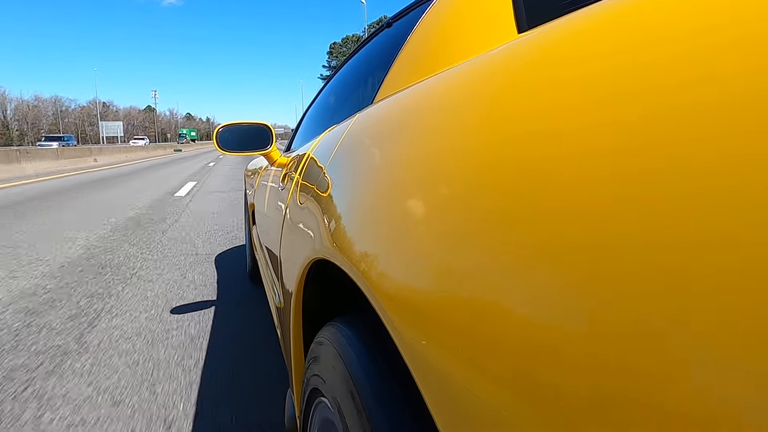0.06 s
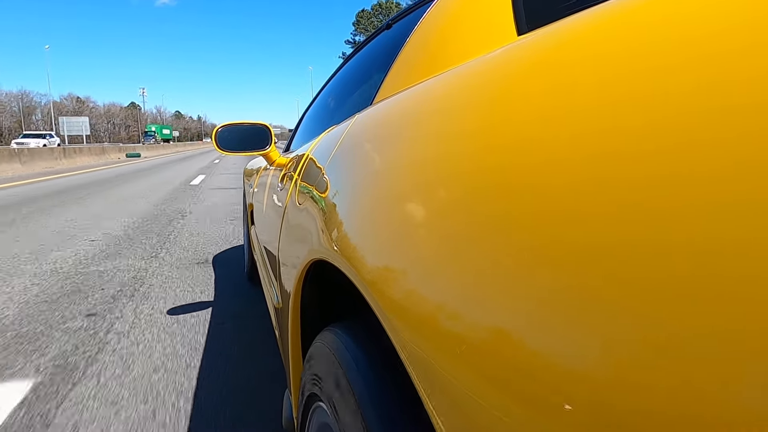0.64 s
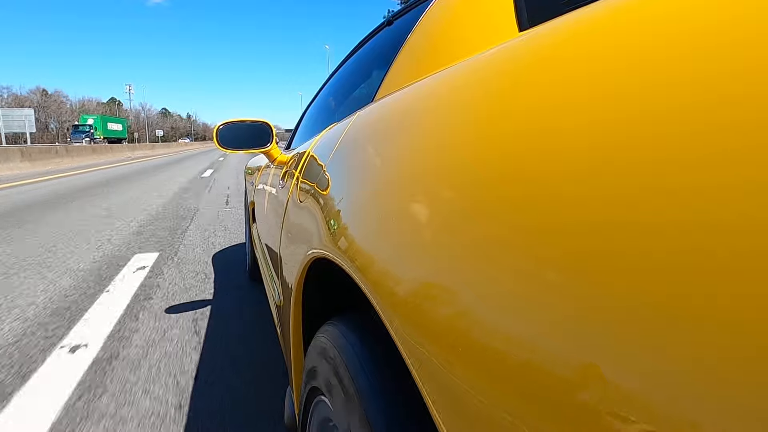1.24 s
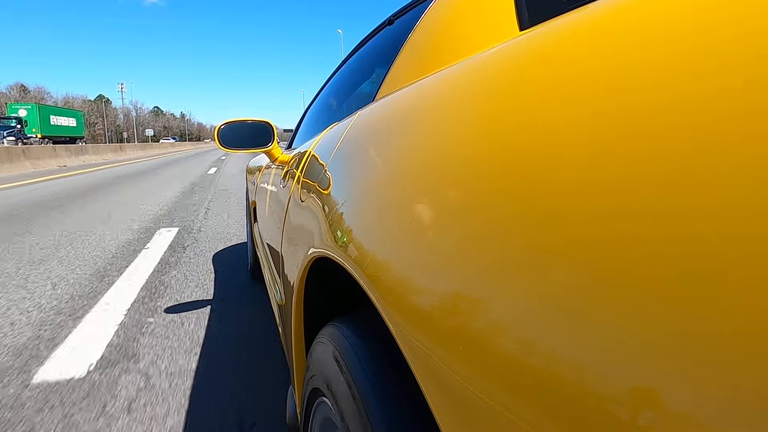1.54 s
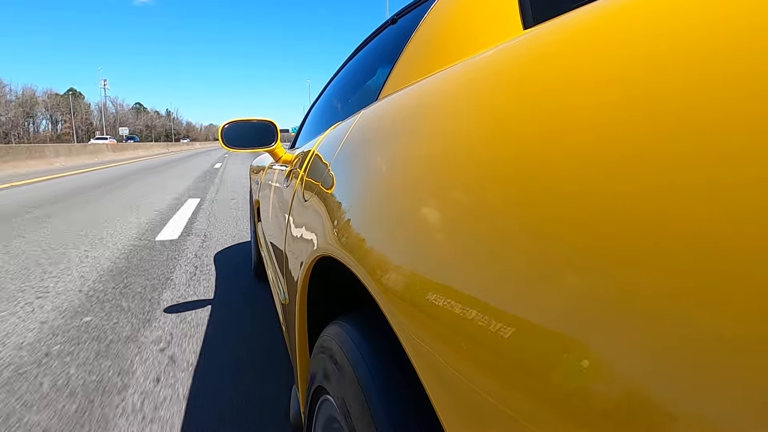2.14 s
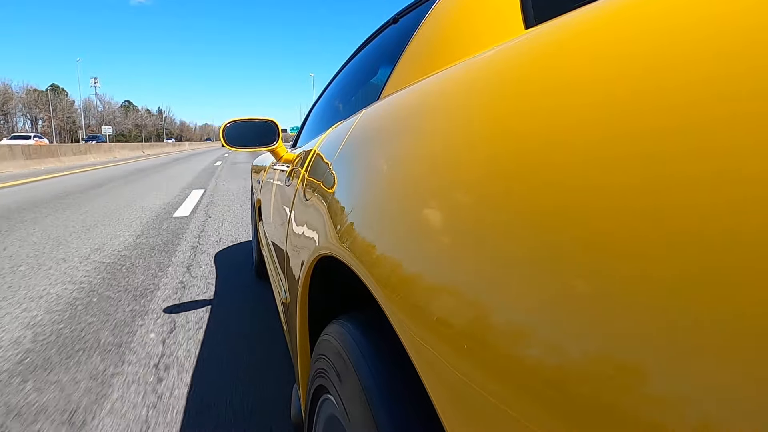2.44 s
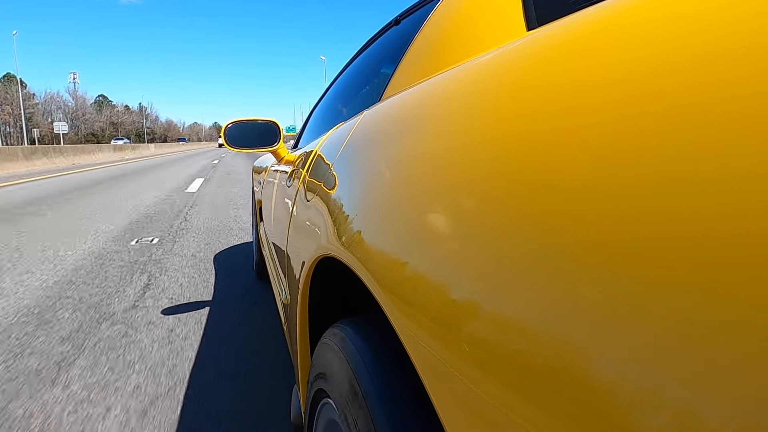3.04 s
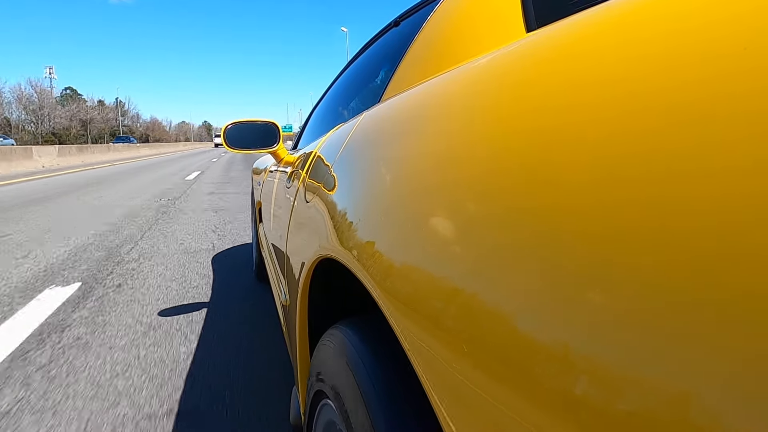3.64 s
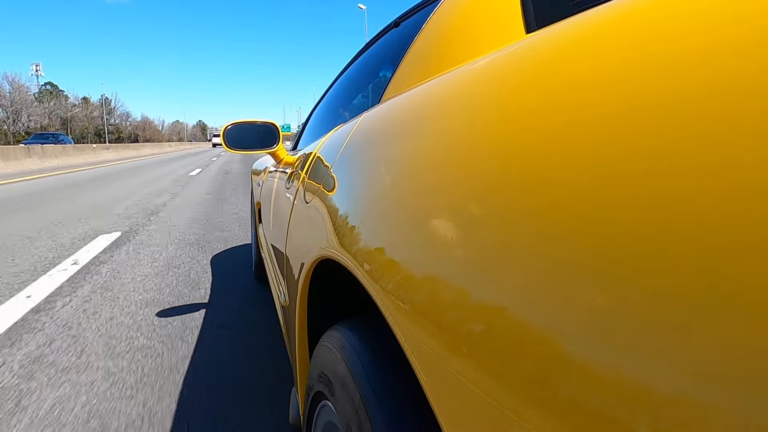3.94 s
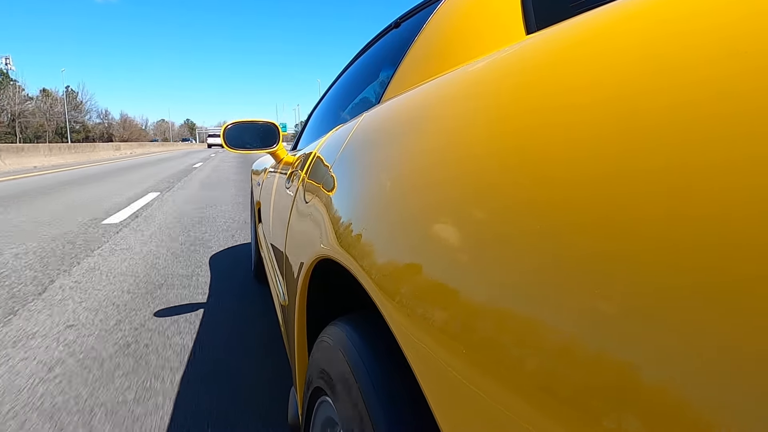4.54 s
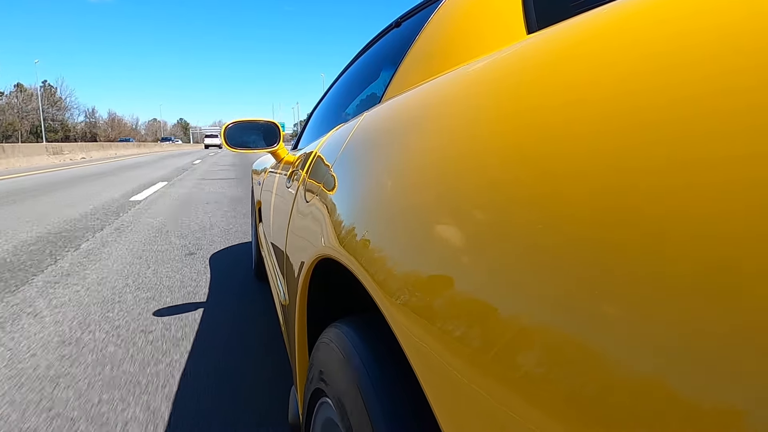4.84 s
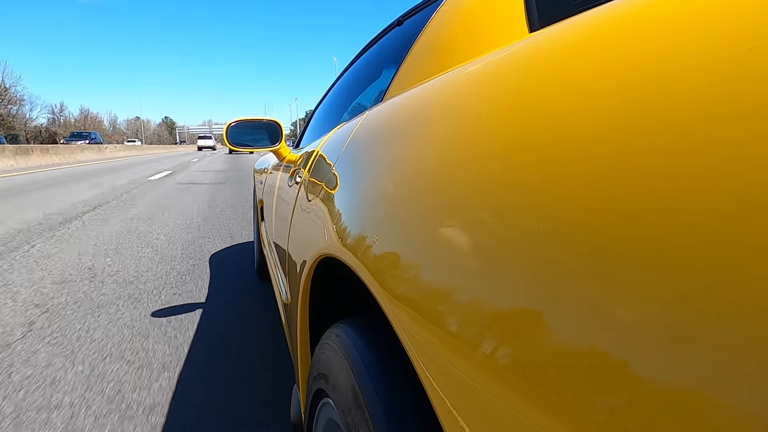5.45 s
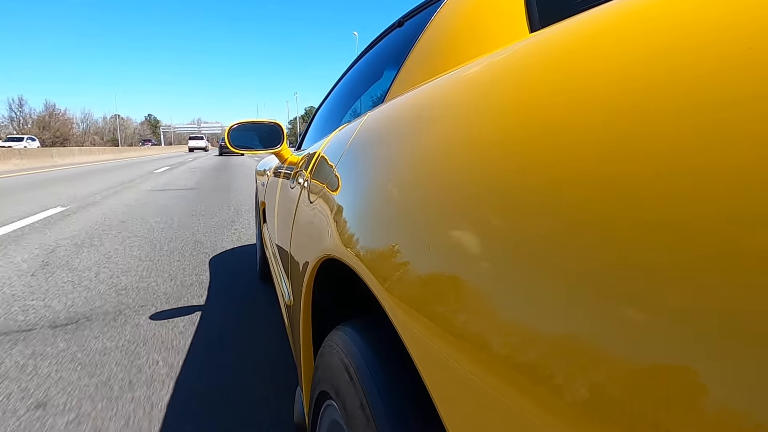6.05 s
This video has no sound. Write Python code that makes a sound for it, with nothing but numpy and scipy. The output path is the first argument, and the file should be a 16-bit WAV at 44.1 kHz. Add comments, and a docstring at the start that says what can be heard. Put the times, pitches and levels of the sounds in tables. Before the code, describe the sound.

Heavy wind buffets the microphone on a car at highway speed, over roaring tyres and a faint, throaty exhaust drone.

```python
"""Highway, at a camera on the rear flank of a V8 sports car at speed.
The slipstream buffets the microphone and hisses over its housing; shed vortices add a wandering throb.
Tyres roar on the asphalt, a throaty rumble swells, the exhaust drones faintly under the wind.
The camera's limiter holds down the strongest buffets."""
import sys
import numpy as np
from scipy import signal
from scipy.fft import rfft, irfft, next_fast_len
from scipy.io import wavfile
from scipy.ndimage import uniform_filter1d, minimum_filter1d, map_coordinates

SR = 44100
rng = np.random.default_rng(int(sys.argv[2]) if len(sys.argv) > 2 else 0)


def wav_out(sig):
    """Save sig, one row per channel (or a flat mono array), as 16-bit PCM at SR to the path in sys.argv[1]."""
    wavfile.write(sys.argv[1], SR, np.round(np.clip(np.atleast_2d(sig).T, -1, 1) * 32767).astype(np.int16))


N = 277389

# four-stroke cycle rate: time_s, cycle_hz
ENGINE_SPEED = [(0, 17.57), (6.29, 15.2)]
# exhaust partials, eight firings a cycle: cycle_multiple, level_db
EXHAUST_PARTIALS = [(8, 0.5), (10, 3.5), (12, 4.5), (18, -0.5), (27, -8)]
# throaty rumble: freq_hz, density_db
THROAT_SPECTRUM = [(120, -44), (205, -11.5), (245, 0.5), (300, -1), (345, -10.5), (600, -50), (2000, -100)]
# brief hollow swells: peak_s, length_s, pitch_hz, level_db
HOLLOW_SWELLS = [(.04, 0.1, 470, -28), (.45, 0.24, 310, -27), (1.199, 0.16, 165, -26),
                 (1.776, 0.22, 248, -17.5), (1.94, 0.27, 290, -20.5), (2.21, .08, 590, -28.5),
                 (2.47, .25, 135, -24), (3.05, .2, 140, -25), (3.52, .18, 290, -26), (4.04, .28, 200, -23),
                 (4.45, 0.31, 430.6, -29), (5.14, 0.14, 160, -22)]
# air churned in the wheel arch: freq_hz, density_db
ARCH_SPECTRUM = [(250, -32), (390, -2), (470, -0.5), (560, -5.5), (630, -9.5), (690, -8.5), (780, -15),
                 (1300, -31), (3000, -68.5)]
# wheel arch rush: time_s, level_db
ARCH_LEVEL = [(0, -22), (.27, -28.5), (.7, -28), (1.6, -30.5), (2.3, -31), (3.6, -30), (4.5, -27.5),
              (5.2, -32.5), (6.29, -29.5)]
# tread on asphalt: freq_hz, density_db
TREAD_SPECTRUM = [(300, -26), (600, -3), (760, -3), (880, -0.3), (1130, 1), (1300, -2), (1650, -5.5),
                  (2000, -10), (2600, -26), (3600, -37), (5500, -38), (12000, -84.5)]
# slow trend of road and air: time_s, roar_db, hiss_db
RUSH_LEVELS = [(0, -28, -40.5), (.25, -34, -40.5), (.55, -30.5, -39), (1.25, -32, -41.5),
               (1.7, -29.7, -40.5), (1.9, -33.5, -43), (2.1, -30, -42), (2.85, -33.5, -41),
               (3.25, -28.2, -41), (3.75, -29, -42), (4.3, -28.5, -38), (4.85, -29.5, -40),
               (5.4, -30.5, -38.5), (5.75, -32, -40), (6.29, -29, -38.5)]
# gusts (+) and sudden dips (-), like a limiter ducking: peak_s, length_s, hiss_db, roar_db
RUSH_GUSTS = [(.449, 0.04, 0.5, 2.5), (.7, 0.062, 0, 0), (.785, 0.084, -6, -5), (.96, 0.079, 2, 1.2),
              (1.058, 0.023, 1, 1), (1.082, .029, -2, -3), (1.22, 0.087, 1.5, 2.5),
              (1.351, 0.022, -1.9, -5), (1.427, 0.072, -0.5, 1.8), (1.566, .068, -2, -2),
              (1.957, 0.02, -3, -7), (2.066, 0.044, 0.5, 3), (2.182, .05, 7, 3.5), (2.315, .035, -3, -3),
              (2.407, 0.098, 2.2, 3.5), (2.625, 0.061, 1.5, 3.5), (2.694, 0.037, -4, .7),
              (2.806, .124, 2, 6), (2.964, .065, 3, 4.5), (3.256, .058, -2.5, -2), (3.41, .055, -2, -2),
              (3.497, 0.025, 3, 0.5), (3.55, .05, -2.5, -2), (3.663, .067, 2.4, 2), (3.71, 0.019, -4, -3.5),
              (3.873, 0.024, -.9, -5.4), (4.055, 0.05, 3, 1), (4.15, 0.065, 1.5, -0.5),
              (4.244, 0.026, -4.6, -4), (4.696, 0.051, 3.6, 2.5), (4.757, .028, 2, -4),
              (4.912, 0.072, 4, 1), (5.173, 0.036, -4, -1.5), (5.255, .06, 4, 1), (5.305, 0.036, 5, 4.8),
              (5.337, .04, -2.5, -4), (5.425, 0.091, 1.5, 5), (5.584, .023, 1, 1.5), (5.851, .07, 3.6, 1.9),
              (5.88, .022, -6, -5), (5.941, .047, -3, -3), (6.123, .035, 4.5, 4.5),
              (6.152, 0.092, -3.5, -5)]
# air over the microphone port: freq_hz, density_db
HISS_SPECTRUM = [(500, -4), (1800, 10.5), (2500, 7.5), (3100, 1), (3600, 0.5), (4400, -8), (5500, -14.3),
                 (7600, -15.5), (9300, -19), (10300, -22.5)]
# bright sizzle of the opening gust: freq_hz, density_db
SIZZLE_SPECTRUM = [(1500, -16.5), (3000, 8.5), (4700, 2.5), (6200, -5), (8500, -13), (10000, -12.5)]
# fading sizzle: time_s, level_db
SIZZLE_FADE = [(0, -40), (.15, -48), (.68, -50), (.8, -55), (2.5, -57), (4, -57.5), (6.29, -59.5)]
# vortices leaving the flank: time_s, shed_hz, level_db
VORTEX_SHEDDING = [(0, 102.3, -21), (.2, 101.1, -21.5), (.6, 109.8, -21.5), (.8, 72.8, -22.5),
                   (1.15, 78.1, -23), (1.5, 104, -23), (1.9, 109.4, -19.5), (2.05, 106.6, -27),
                   (2.23, 108.4, -20.5), (2.45, 79.86, -25), (2.85, 86, -21.5), (3.13, 75, -17.5),
                   (3.3, 72.86, -23), (3.55, 72, -22), (4.05, 93.9, -22.5), (4.35, 76, -23),
                   (4.7, 108, -22), (5.05, 88, -22.5), (5.5, 84, -22.5), (5.72, 105.6, -21),
                   (6.03, 78.1, -19), (6.29, 105, -22.5)]
# small eddies off the camera housing: freq_hz, density_db
FLUTTER_SPECTRUM = [(60, -24.5), (130, -9.5), (190, -1.5), (300, -1), (350, -6), (430, -9.5), (560, -21.5),
                    (1300, -48.5), (3000, -93.5)]
# large eddies on the microphone: freq_hz, density_db
BUFFET_SPECTRUM = [(5, -17), (20, -7.5), (40, -4.5), (65, 1.5), (90, -3.5), (125, 0.5), (170, -6.5),
                   (260, -17.5), (600, -69)]
# wind surges (+) and dips (-): peak_s, length_s, large_eddy_db, small_eddy_db
EDDY_SURGES = [(.176, 0.1, 4, 3), (.405, 0.065, -3.5, 0), (1.27, 0.42, 0, 2), (1.8, 0.32, 0.1, 2),
               (2.228, 0.13, -0.5, -1.5), (2.51, 0.15, 1.5, 3.5), (3.057, .087, 0, 2),
               (3.121, 0.092, 1, -2), (3.76, 0.072, 1, 0), (4.01, .25, 0.5, 1), (4.44, 0.26, 1, -1),
               (4.885, 0.11, 0, -2), (5.145, 0.069, -1.5, 3), (5.5, 0.18, 1, 0), (5.77, .125, 1.5, -0.5),
               (5.95, 0.31, -1.5, -0.5)]
# microphone treble roll-off: freq_hz, gain_db
MIC_RESPONSE = [(8500, 0), (10300, -8), (12000, -20), (15500, -37)]

BUILD_SHARE = 0.65  # slow side's share of a gust, dip or swell
RUMBLE_SWING_DB, RUSH_SWING_DB = 0.6, 0.63  # depth of the flow's unsteadiness


def amp(db):
    """Decibels to gain."""
    return 10 ** (np.asarray(db) / 20)


def unit(x):
    """x at rms 1."""
    return x / np.sqrt(np.mean(x ** 2) + 1e-20)


def curves(rows):
    """One per-sample curve for each column after time_s."""
    time_s, *columns = np.transpose(rows)
    return [np.interp(np.arange(N) / SR, time_s, column) for column in columns]


def gain_at(spectrum, hz):
    """Gain from a dB table, read on a log frequency axis."""
    freq_hz, level_db = np.transpose(spectrum)
    return amp(np.interp(np.log(hz + 1), np.log(freq_hz + 1), level_db))


def wobble(rate_hz):
    """Smooth random curve, rate_hz knots a second."""
    knots = rng.standard_normal(int(N * rate_hz / SR) + 4)
    return map_coordinates(knots, [np.arange(N) * rate_hz / SR])


def phase(hz):
    """Running phase in radians."""
    return 2 * np.pi * np.cumsum(hz) / SR


def smooth(x, width_s):
    """Two running means: a triangular window."""
    width = max(int(width_s * SR), 1)
    return uniform_filter1d(uniform_filter1d(x, width), width)


def filtered(x, response):
    """x through a frequency response."""
    size = next_fast_len(N + 8192)
    return irfft(rfft(x, size) * response(np.fft.rfftfreq(size, 1 / SR)), size)[:N]


def bump(peak_s, length_s, rise_share):
    """Lopsided bell of height 1, length_s wide at half height."""
    t = np.arange(N) / SR - peak_s
    side_s = length_s * np.where(t < 0, rise_share, 1 - rise_share)
    return np.exp2(-np.minimum((t / side_s) ** 2, 60))


def gusting(rows):
    """Two dB curves: gusts build slowly and break off, dips drop fast and recover slowly."""
    total_db = np.zeros((2, N))
    for peak_s, length_s, *levels_db in rows:
        rise_share = BUILD_SHARE if sum(levels_db) > 0 else 1 - BUILD_SHARE
        total_db += np.outer(levels_db, bump(peak_s, length_s, rise_share))
    return total_db


def turbulence(spectrum, patchy_db, even_s):
    """Coloured noise; bands swell and fade in patches, total power stays even over even_s."""
    bands = signal.stft(rng.standard_normal(N), nperseg=512)[2]
    patches = uniform_filter1d(rng.standard_normal(bands.shape), size=9, axis=0)
    patches = uniform_filter1d(patches, size=10, axis=1)
    patchy = signal.istft(bands * amp(patchy_db * unit(patches)), nperseg=512)[1][:N]
    noise = unit(filtered(patchy, lambda hz: gain_at(spectrum, hz)))
    return noise / np.sqrt(np.abs(smooth(noise ** 2, even_s)) + 1e-9)


def exhaust(level_db=-30.5):
    """Uneven firing of the two banks: a wavering drone on multiples of the engine cycle."""
    cycle_hz, = curves(ENGINE_SPEED)
    cycle_rad = phase(cycle_hz)
    drone = np.zeros(N)
    for multiple, partial_db in EXHAUST_PARTIALS:
        gain = amp(partial_db + 2.3 * wobble(1.7))
        drone += gain * np.sin(round(multiple) * cycle_rad + rng.uniform(0, 2 * np.pi))
    return amp(level_db) * unit(drone)


def throaty_rumble(steady_db=-36, swell_width_hz=56.3):
    """Steady rumble with brief swells of narrow noise, each at its own pitch."""
    rumble = amp(steady_db) * turbulence(THROAT_SPECTRUM, patchy_db=0.5, even_s=0.067)
    for peak_s, length_s, pitch_hz, level_db in HOLLOW_SWELLS:
        tone = np.sin(phase(pitch_hz + swell_width_hz / 2 * wobble(90)))
        envelope = amp(level_db + 2.9 * wobble(70)) * bump(peak_s, length_s, BUILD_SHARE)
        rumble += envelope * tone
    return rumble


def tyres(roar_db):
    """Tread blocks slap the asphalt and pump air; the wheel churns the air in its arch."""
    arch_db, = curves(ARCH_LEVEL)
    tread = amp(roar_db + 0.61 * wobble(40)) * turbulence(TREAD_SPECTRUM, patchy_db=0.92, even_s=0.043)
    arch = amp(arch_db) * turbulence(ARCH_SPECTRUM, patchy_db=2.0, even_s=0.14)
    return tread + arch


def port_ring(re_hiss_db=-24.5, centre_hz=8530, width_hz=1200, swing_db=2):
    """Air across the microphone port excites its resonance in uneven puffs."""
    def resonance(hz):
        damping = 1j * hz * width_hz
        return damping / (centre_hz ** 2 - hz ** 2 + damping)

    ring = filtered(rng.standard_normal(N), resonance)
    return amp(re_hiss_db + swing_db * wobble(26)) * unit(ring)


def vortex_throb(jitter_hz=15.03, swing_db=2.5):
    """Vortices shed at a wandering rate beat on the microphone: an unsteady low note."""
    shed_hz, level_db = curves(VORTEX_SHEDDING)
    tone = np.sin(phase(shed_hz + jitter_hz * wobble(42)))
    return amp(level_db) * unit(amp(swing_db * wobble(22)) * tone)


def slipstream(hiss_db, gust_db, unsteady, buffet_db=-17, flutter_db=-19.5):
    """Eddies thump on the microphone; the hiss sputters as they speed and slow the air at the port."""
    large_db, small_db = gusting(EDDY_SURGES) + RUMBLE_SWING_DB * unsteady
    sizzle_db, = curves(SIZZLE_FADE)
    eddies = turbulence(BUFFET_SPECTRUM, patchy_db=-0.5, even_s=0.041)
    flutter_gain = amp(flutter_db + small_db + 1.5 * wobble(38))
    flutter = flutter_gain * turbulence(FLUTTER_SPECTRUM, patchy_db=2.0, even_s=0.06)
    hiss = amp(hiss_db) * (turbulence(HISS_SPECTRUM, patchy_db=-0.1, even_s=0.067) + port_ring())
    sizzle = amp(sizzle_db) * turbulence(SIZZLE_SPECTRUM, patchy_db=1.0, even_s=0.04)
    sputter = unit(amp(1.2 * eddies + 0.85 * wobble(55)))
    rumble = amp(large_db) * (amp(buffet_db) * eddies + vortex_throb())
    return rumble + flutter + amp(gust_db) * sputter * (hiss + sizzle)


def limiter(x, ceiling_db, hold_s):
    """Gain ducks just ahead of each peak over the ceiling."""
    needed_gain = np.minimum(1, amp(ceiling_db) / (np.abs(x) + 1e-9))
    held_gain = minimum_filter1d(needed_gain, int(hold_s * SR))
    return x * smooth(held_gain, hold_s / 2)


def scene():
    """Wind, road and engine in mono; the same gusts and dips move hiss and roar."""
    roar_db, hiss_db = curves(RUSH_LEVELS)
    unsteady = wobble(rate_hz=45)
    air_gust_db, road_gust_db = gusting(RUSH_GUSTS) + RUSH_SWING_DB * unsteady
    wind = slipstream(hiss_db, air_gust_db, unsteady)
    road = tyres(roar_db + road_gust_db)
    return (wind + road + throaty_rumble() + exhaust())[None]


def record(dry):
    """Camera: peak limiter, treble roll-off, band limit."""
    top_hz = 15700
    limited = limiter(dry[0], ceiling_db=-5.0, hold_s=0.018)
    return filtered(limited, lambda hz: gain_at(MIC_RESPONSE, hz) * (hz < top_hz))[None]


dry = scene()
out = record(dry)
wav_out(out)
```